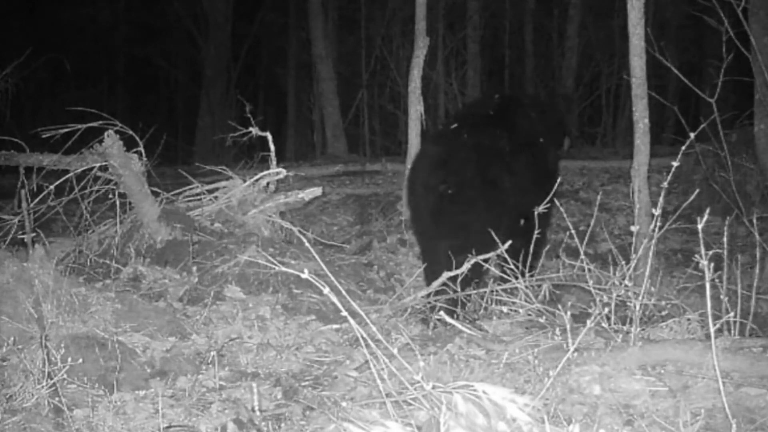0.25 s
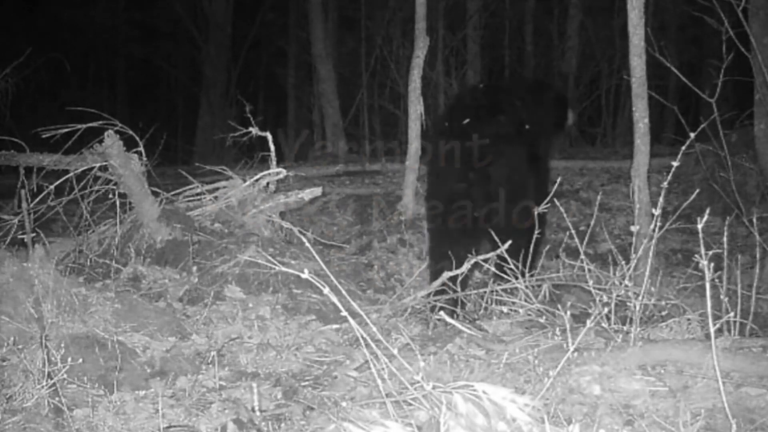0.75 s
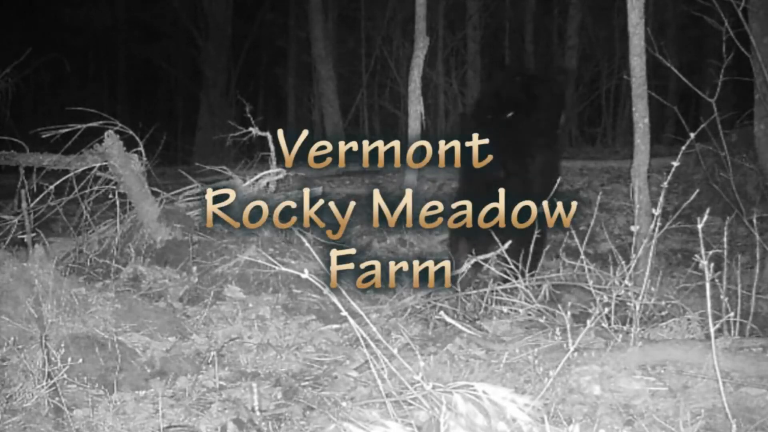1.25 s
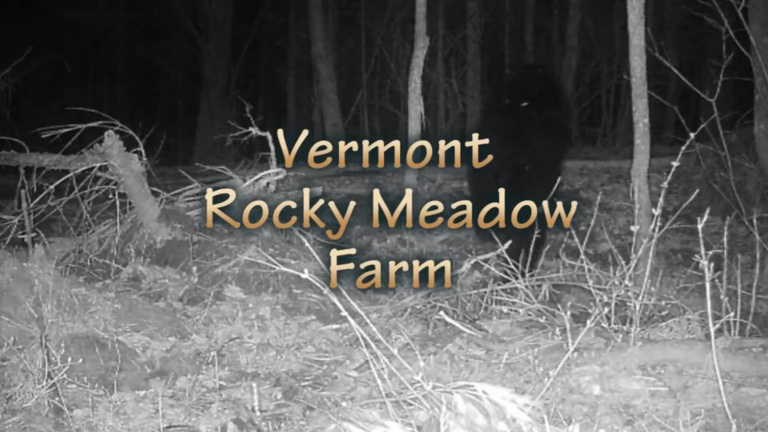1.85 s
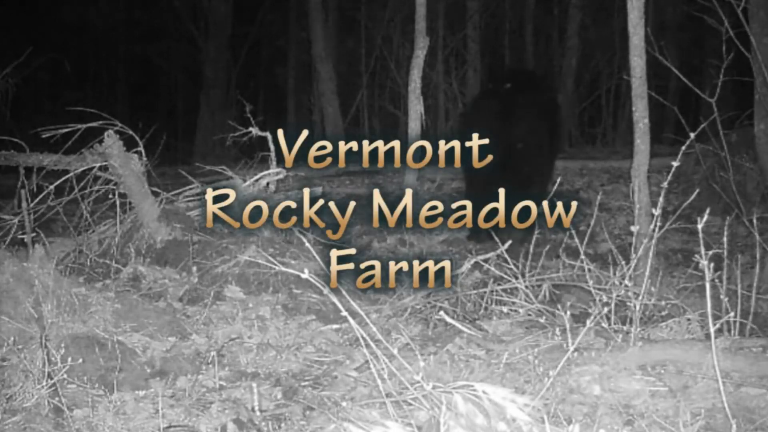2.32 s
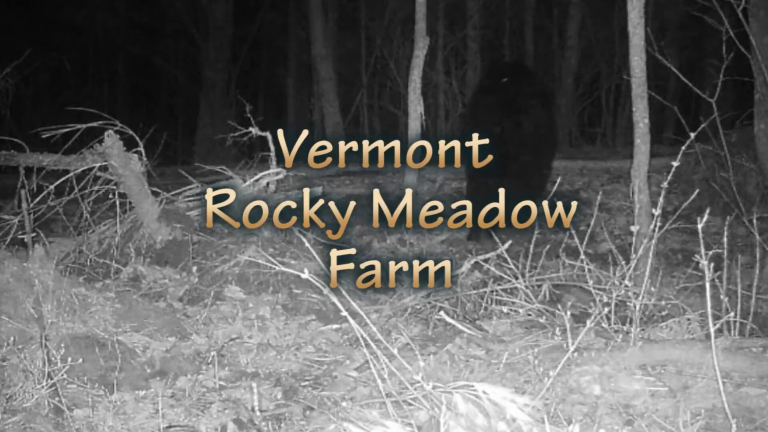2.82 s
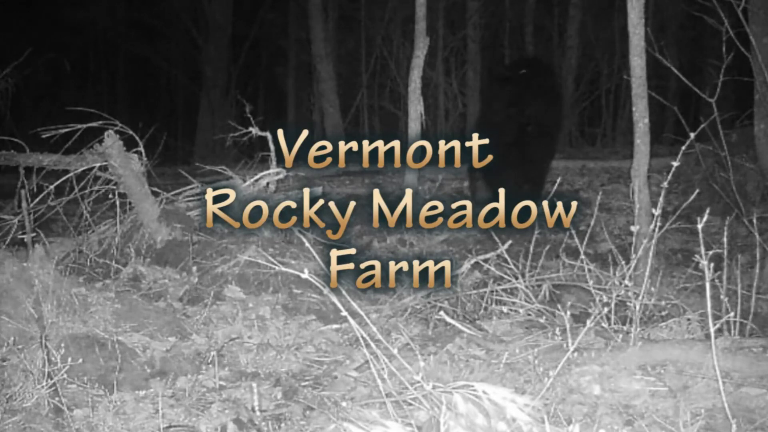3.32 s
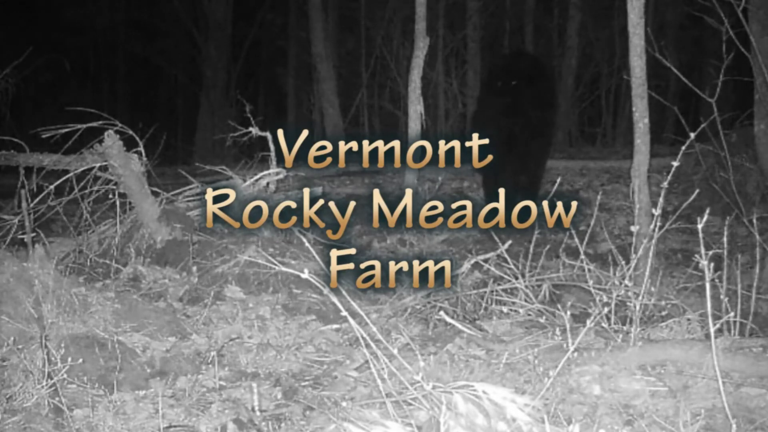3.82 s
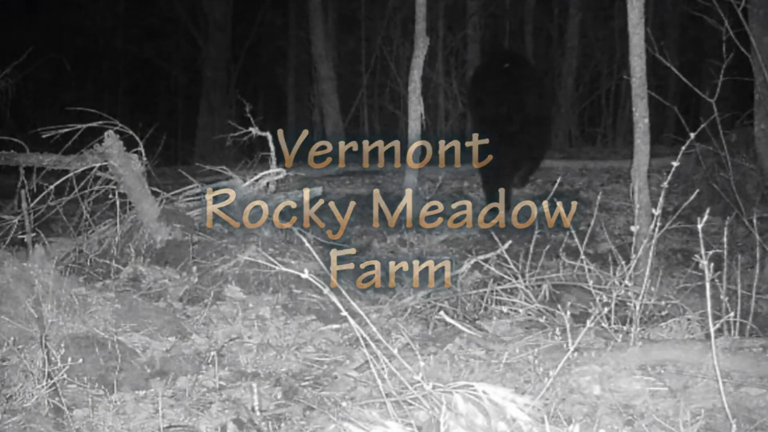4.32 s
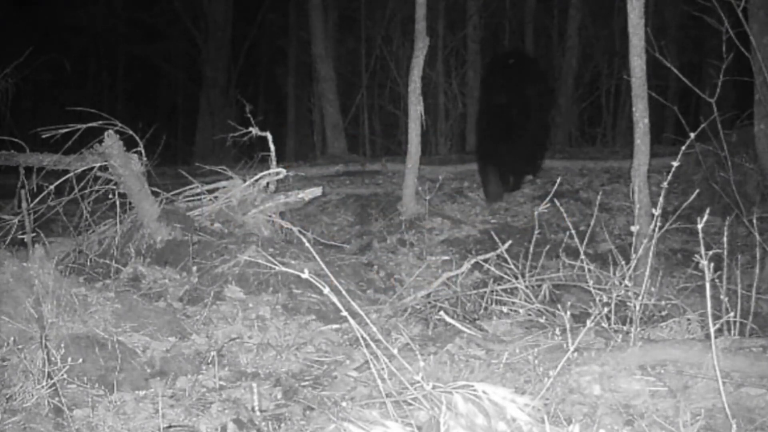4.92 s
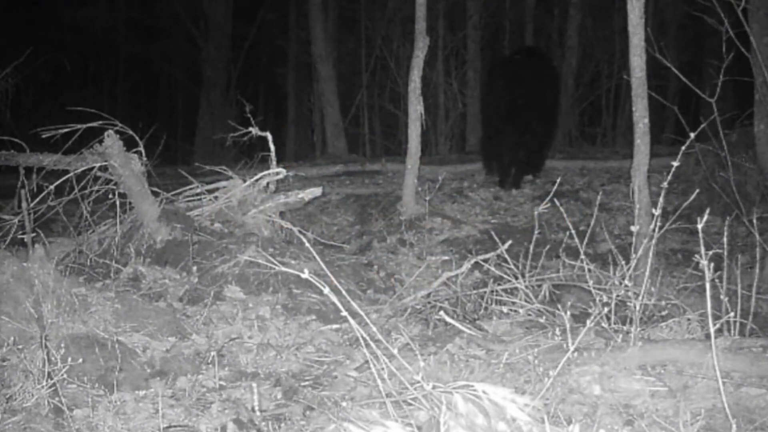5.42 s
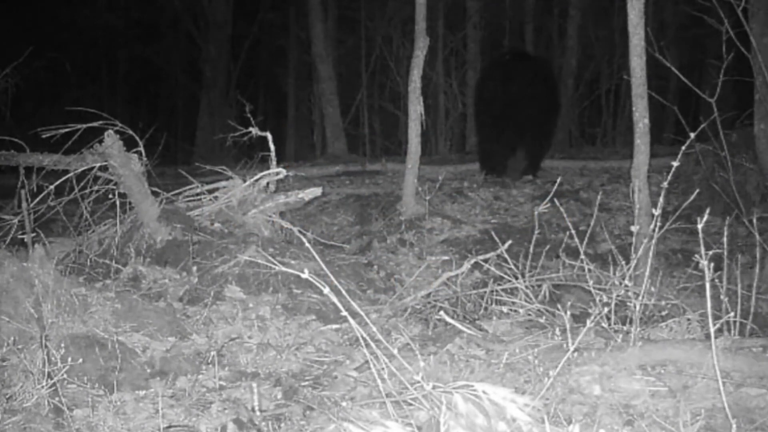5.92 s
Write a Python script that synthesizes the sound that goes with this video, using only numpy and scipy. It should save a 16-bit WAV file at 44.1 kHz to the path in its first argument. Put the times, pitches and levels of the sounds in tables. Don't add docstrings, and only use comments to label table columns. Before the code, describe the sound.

Distant owl duet in a dark forest: arched clear hoots, then rough rising notes ending in a downward slide, with crickets chirping steadily throughout.

```python
import sys
import numpy as np
from scipy import signal
from scipy.fft import rfft, irfft
from scipy.io import wavfile
from scipy.ndimage import uniform_filter1d

SR = 44100
rng = np.random.default_rng(int(sys.argv[2]) if len(sys.argv) > 2 else 0)


def store_wav(level_fs):
    pcm = np.round(np.clip(np.atleast_2d(level_fs), -1, 1) * 32767)
    wavfile.write(sys.argv[1], SR, pcm.T.astype(np.int16))


def to_linear_factor(level_db):
    exponent = np.asarray(level_db, float) / 20
    return 10 ** exponent


N = 271656


def evened(x):
    return x / np.sqrt(np.mean(x ** 2) + 1e-20)


def read(points, hz):
    f, value = np.transpose(points)
    return np.interp(np.log(hz + 1), np.log(f + 1), value)


def curve(points):
    return np.interp(np.arange(N) / SR, *np.transpose(points))


def add(mix, s, sound):
    at = round(s * SR)
    part, sound = mix[max(at, 0):], sound[max(-at, 0):]
    part[:len(sound)] += sound[:len(part)]


def band(x, lo_hz, hi_hz, order):
    return signal.sosfilt(signal.butter(order, [lo_hz, hi_hz], "bandpass", fs=SR, output="sos"), x)


def smooth_twice(x, size):
    return uniform_filter1d(uniform_filter1d(x, size), size)


def drift(per_s, size=N):
    slow = signal.butter(2, per_s, fs=SR, output="sos")
    return evened(signal.sosfilt(slow, rng.standard_normal(size)))


def woods(x, t60, start_s, channels):
    t = np.arange(SR) / SR
    taps = rng.choice([-1., 1.], (channels, SR)) * (rng.random((channels, SR)) < 2000 / SR)
    taps *= to_linear_factor(-60 * t / t60) * np.clip(t / start_s, 0, 1)
    return signal.fftconvolve(x[None], taps / np.linalg.norm(taps[0]), axes=1)[:, :N]


# (f/Hz, level/dB per Hz)
AIR = [(15, -56), (25, -27), (58, -19), (108, -19.5), (212, -35.5), (562, -29.5), (1160, -44.5),
       (1610, -32), (2380, 2), (2920, -21.5), (3320, -45.5), (4880, -35), (5700, -47), (7000, -44),
       (11700, -52), (15200, -100.5), (22000, -120)]


def air():
    frames, hz = N // 512 + 5, np.fft.rfftfreq(2048, 1 / SR)
    a, b = rng.standard_normal((2, 3, len(hz), frames))
    z = (a + 1j * b) * to_linear_factor(read(AIR, hz))[:, None]
    shared = 0.18 / (1 + hz / 900)[:, None]
    noise = signal.istft(z[:2] + shared * z[2], nperseg=2048)[1][:, :N]
    return to_linear_factor(-54) * evened(noise)


# (t/s, level/dB)
MURMUR = [(0, -88.5), (.5, -76.5), (.65, -74.5), (1.5, -74.5), (2.6, -69), (3.5, -72.5), (4.7, -73),
          (5.0, -85), (6.2, -96.5)]


def murmur():
    a, b, both = evened(band(rng.standard_normal((3, N)), 170, 460, order=2))
    swells = to_linear_factor(curve(MURMUR) + 3.9 * drift(7.1))
    return swells * (both + 0.15 * np.array([a, b]))


# (t/s, level/dB)
HUM = [(0, -76.5), (.48, -75.5), (.52, -100), (3.6, -100), (4.5, -78), (6.16, -77.5)]


def hum():
    t = np.arange(N) / SR
    return np.sqrt(2) * to_linear_factor(curve(HUM)) * np.sin(2 * np.pi * 107.7 * t)


def stroke(hz, fall_hz, length_s, partials_db, soft=1.3):
    u = np.linspace(0, 1, round(length_s * SR))
    turns = np.cumsum(hz + fall_hz * (.5 - u)) / SR
    shape = np.abs(np.sin(np.pi * u)) ** soft
    pulse = np.zeros(len(u))
    for k, db in enumerate(partials_db, 1):
        pulse += to_linear_factor(db) * shape ** (1 + 0.2 * (k - 1)) * np.sin(2 * np.pi * k * turns)
    return pulse


def trill(hz, fall_hz, per_s, db, overtone_db, blur_s=0.61):
    strokes_so_far = np.floor(np.cumsum(per_s * (1 + 0.16 * drift(8))) / SR)
    train = np.diff(strokes_so_far, prepend=0) * to_linear_factor(4.2 * drift(46))
    dry = signal.oaconvolve(train, stroke(hz, fall_hz, .8 / per_s, [0, overtone_db]))[:N]
    return to_linear_factor(db) * evened(woods(dry, blur_s, 0.0035, channels=2))


def phrases(rows, rest_db, edge_s):
    t, out = np.arange(N) / SR, np.full(N, float(rest_db))
    for s, length_s, db in rows:
        on = np.clip(np.minimum(t - s, s + length_s - t) / edge_s + .5, 0, 1)
        out = np.maximum(out, rest_db + (db - rest_db) * on)
    return out


# (start t/s, length t/s, level/dB)
LOW_SONG = [
    (-.2, 0.28, -43),
    (.44, 0.24, -53.5),
    (1.05, 0.42, -52.5),
    (1.86, 0.41, -54.5),
    (2.68, .36, -53),
    (3.42, 0.41, -53.5),
    (4.2, 0.43, -55),
    (5.0, 0.47, -55.5),
    (5.85, 0.32, -52.5),
]
MIDDLE_SONG = [(.12, 0.28, -50.5), (.54, .26, -49.5), (.95, 0.265, -50), (1.41, .22, -44.5),
               (1.89, 0.15, -40.5), (2.24, 0.2435, -48.5), (2.68, .26, -47), (3.16, .2, -51),
               (3.56, 0.278, -47), (4.05, .2, -46.5), (4.5, .24, -52), (4.96, 0.25, -48.5),
               (5.35, 0.271, -49), (5.84, 0.249, -51.5)]
HIGH_SONG = [
    (-.2, 0.24, -83.5),
    (.55, 0.33, -87.5),
    (1.75, 0.36, -89.5),
    (2.96, .34, -92),
    (3.87, .42, -91.5),
    (4.85, 0.43, -88.5),
    (5.76, .36, -89),
]


def chorus():
    low = phrases(LOW_SONG, rest_db=-68, edge_s=.12)
    middle = phrases(MIDDLE_SONG, rest_db=-77, edge_s=0.045)
    high = phrases(HIGH_SONG, rest_db=-106, edge_s=0.021)
    out = trill(2050, 240, 36, low + 0.37, -38.5)
    out += trill(2340, 220, 40, middle + 3.8, -27, blur_s=0.11)
    out += trill(4970, 200, 42, high + 12.0, -40, blur_s=.15)
    crowd = [(1850, -74.0), (2200, -61.0), (2520, -88.5), (2700, -64), (2880, -67.5)]  # (f/Hz, level/dB)
    for hz, db in crowd:
        out += trill(hz, 350, 43, db + 2.9 * drift(1.8), -32.5)
    return out


# (f/Hz, level/dB)
THROAT = [(150, -22), (250, -14), (400, 1), (560, 8.5), (700, -2.5), (900, -13.5), (1080, -22), (1250, -47)]


def hoot(rows, source_db, measured, rough, purer_db, edge_s):
    s, hz, db = np.transpose(rows)
    t = np.arange(s[0], s[-1], 1 / SR)
    hz, db = (uniform_filter1d(np.interp(t, s, c), 500, mode="nearest") for c in (hz, db))
    turns = np.cumsum(hz * (1 + .012 * drift(90, size=len(t)))) / SR
    thin_db = purer_db * np.log2(hz / 280)
    partial_db = [d - thin_db * (k > 1) + read(THROAT, k * hz) for k, d in enumerate(source_db, 1)]
    tone = np.zeros(len(t))
    for k, d in enumerate(partial_db, 1):
        tone += to_linear_factor(d - partial_db[measured]) * np.sin(2 * np.pi * k * turns)
    flutter = 1 + rough * drift(67, size=len(t))
    nearest_end_s = np.minimum(t - s[0], s[-1] - t)
    edges = np.sin(np.pi / 2 * np.clip(nearest_end_s / edge_s, 0, 1)) ** 2
    return s[0], np.sqrt(2) * to_linear_factor(db) * tone * flutter * edges


# (f/Hz, level/dB)
CLEAR_LOUD = [(180, -77), (230, -64.5), (300, -54), (400, -37), (470, -36.5), (535, -32.5), (570, -38.5),
              (592, -39.5)]


def clear_note(s, hold_s, top_hz, effort_db, climb_s):
    start_hz, glide_bend = 189.5, .9
    shoulder_in, shoulder_out = .91, .89
    drop_s, drop_to, sag_to = .017, .62, .43
    v = np.linspace(0, 1, num=9)
    u = v[1:]
    sag_s = .024 + 1.6 * max(hold_s - .074, 0)
    arch = shoulder_in + (shoulder_out - shoulder_in) * u
    rise = 1 - (shoulder_in + shoulder_out) / 2
    arch = arch + rise * np.sqrt(abs(np.sin(np.pi * u))) * min(hold_s / .08, 1)
    dropped = hold_s + drop_s + .13 * sag_s
    t = np.r_[climb_s * (v - 1), hold_s * u, dropped, dropped + sag_s * u]
    climb = start_hz * (shoulder_in * top_hz / start_hz) ** (v ** glide_bend)
    sag = drop_to + (sag_to - drop_to) * u ** .6
    hz = np.r_[climb, top_hz * np.r_[arch, drop_to, sag]]
    db = effort_db + 2 * (t == hold_s)
    db = db - 1 * (t > hold_s)
    db = db - 40 * np.maximum(t - dropped, 0)
    return np.c_[s + t, hz, db + read(CLEAR_LOUD, hz)]


CLEAR_DB = [2, -4, -19, -43.5]
# (plateau start t/s, plateau length t/s, top f/Hz, effort level/dB, climb length t/s)
CLEAR = [
    (-.03, 0.08, 523.4, -27.5, .08),
    (.303, .012, 390, -9.5, 0.084),
    (.658, 0.023, 573.6, -4, .093),
    (1.01, 0.041, 582.5, -1.5, 0.082),
    (1.357, .063, 573.1, 0, 0.083),
    (1.716, 0.078, 580.7, -0.5, 0.073),
    (2.067, .084, 583.7, 1, .068),
    (2.424, 0.084, 594, 0.5, 0.072),
    (2.64, .19, 588.2, 1, .068),
]


def clear_owl():
    out = np.zeros(N)
    for row in CLEAR:
        note = clear_note(*row)
        add(out, *hoot(note, CLEAR_DB, measured=0, rough=.08, purer_db=34, edge_s=.02))
    return out


STROKES = [0, .022, .05, .073, .096, .125, .149, .172]
WING_DB = [1, -25, -32, -48.5]
# (delay t/s, level/dB)
LEAVES = [(.0031, -11.5), (.0062, -9.5)]
# (t/s, level/dB, number of pulses)
CHIRPS = [(.184, -30, 5), (0.592, -29, 5), (1.001, -29.5, 8), (1.491, -30, 5), (1.885, -31, 5),
          (2.278, -30, 8), (2.749, -29.5, 5), (3.15, -31, 8), (3.628, -30, 5), (4.035, -30, 5),
          (4.463, -30, 8), (4.939, -30, 8), (5.399, -32, 5), (5.824, -29.5, 8)]


def cricket():
    dry = np.zeros(N)
    for s, db, count in CHIRPS:
        for k, after in enumerate(STROKES[:round(count)]):
            a, b = rng.standard_normal(2)
            force_db = -9 * np.exp(-k / 1.1) * (np.arange(4) > 0)
            pulse = stroke(2372 + 14 * a, 235, .02, WING_DB + force_db)
            add(dry, s + after - .0105, to_linear_factor(db + 5.0 + 1.8 * b) * pulse)
    direct = dry.copy()
    for s, db in LEAVES:
        add(dry, s, to_linear_factor(db + 3.7 * drift(30)) * direct)
    effort = uniform_filter1d(abs(dry), 1200)
    noise = rng.standard_normal((2, N))
    scrape = to_linear_factor(-46 + 6 * np.minimum(drift(18), 1.2)) * evened(band(noise, 3300, 4400, order=4))
    scrape += to_linear_factor(-52 + 5 * np.minimum(drift(12), 1.2)) * evened(band(noise, 6100, 6700, order=4))
    rectified = to_linear_factor(-24.5) * band(effort, 19, 35, order=1)
    wet = woods(dry, 0.27, 0.005, channels=3)
    shared = dry + to_linear_factor(-14) * wet[0]
    lag_s = 0.17 / 1000
    hz = np.fft.rfftfreq(2 * N, 1 / SR)
    late = irfft(rfft(shared, 2 * N) * np.exp(-2j * np.pi * hz * lag_s))[:N]
    pair = np.array([to_linear_factor(-1.2) * late, to_linear_factor(-.8) * shared])
    return pair + to_linear_factor(-14.5) * wet[1:] + effort * scrape + rectified * to_linear_factor(np.array([[-6], [0]]))


def tick():
    out = np.zeros(N)
    add(out, .4953, to_linear_factor(-40) * np.array([1, .6, .3]))
    return out


# (t/s, peak level/dB, f/Hz)
THUMPS = [
    (1.049, -70, 69),
    (2.863, -75, 100),
    (3.848, -88, 46.4),
]


def footfalls():
    out, t = np.zeros(N), np.arange(5000) / SR
    for s, db, hz in THUMPS:
        add(out, s - .03, to_linear_factor(db) * np.sin(2 * np.pi * hz * t) * np.hanning(5000))
    return out


# (f/Hz, level/dB)
REEDY_LOUD = [(160, -68.5), (200, -57.5), (228, -46), (255, -41.5), (290, -40.5), (325, -44.5),
              (360, -53.5), (435, -61)]


def reedy_note(s, climb_s, top_hz, effort_db, fall_s):
    rest_hz = 165
    u = np.linspace(0, 1, num=10)
    t = np.r_[climb_s * (u - 1), fall_s * u[1:]]
    hz = rest_hz + (top_hz - rest_hz) * np.r_[u ** .75, 1 - u[1:] ** 1.265]
    return np.c_[s + t, hz, effort_db + read(REEDY_LOUD, hz)]


REEDY_DB = [4.5, 3.5, 1.5, -12]
# (top t/s, climb length t/s, top f/Hz, effort level/dB, fall length t/s)
REEDY = [
    (1.648, 0.052, 222, -0.5, 0.065),
    (2.024, 0.08, 251.8, -3.5, .05),
    (2.39, 0.098, 283.2, -2.5, 0.074),
    (2.752, 0.085, 302.3, -0.5, 0.088),
    (3.112, 0.1, 331.6, -1, 0.051),
    (3.456, .106, 342.7, -1, .064),
    (3.79, .11, 363.6, -2, 0.071),
    (4.12, .11, 352.7, -0.5, 0.05),
]
# (t/s, f/Hz, effort level/dB)
SLIDE = [
    (4.22, 161, 0),
    (4.249, 251.6, 0),
    (4.266, 297.8, -2),
    (4.31, 312.2, 0.5),
    (4.36, 447.4, 0.5),
    (4.41, 419.8, 2),
    (4.45, 301, 0.5),
    (4.501, 246.7, -1.5),
    (4.769, 165, -2.5),
]


def reedy_owl():
    out = np.zeros(N)
    slide = [(s, hz, db + read(REEDY_LOUD, hz)) for s, hz, db in SLIDE]
    for rows in [reedy_note(*row) for row in REEDY] + [slide]:
        add(out, *hoot(rows, REEDY_DB, measured=1, rough=.25, purer_db=3.0, edge_s=.035))
    return out


# (delay t/s, level/dB)
ECHOES = [(.03, -8.5), (.055, -15.5), (.105, -19), (.16, -20.5)]
# (t/s, level/dB)
WET = [(0, -3.5), (1.6, -2.5), (2.3, -2), (4.7, 1.5), (4.85, 1.5), (4.95, -14.5), (5.1, -32), (6.2, -42)]


def owls():
    voices = clear_owl() + reedy_owl()
    breath = smooth_twice(abs(voices), 2000) * evened(band(rng.standard_normal(N), 300, 850, order=4))
    dry = band(voices, 200, 1200, order=2) + to_linear_factor(-32.5) * breath
    dull = band(band(dry, 400, 1100, order=1), 200, 1100, order=3)
    echoes = np.zeros(N)
    for s, db in ECHOES:
        add(echoes, s, to_linear_factor(db) * dull)
    scatter, spread = woods(dull, 1.0, 0.015, channels=2)
    wash = woods(dull, 5.4, 0.21, channels=1)[0]
    heard_db = 10 * np.log10(abs(smooth_twice(dry ** 2, round(.095 * SR))) + 1e-9)
    wet = to_linear_factor(curve(WET) + .41 * np.clip(heard_db + 46.5, -20, 0))
    ahead = dry + wet * (echoes + to_linear_factor(-7.0) * scatter + to_linear_factor(-11.0) * wash)
    return ahead * to_linear_factor(np.array([[-.3], [.3]])) + wet * to_linear_factor(-19.0) * spread * [[1], [-1]]


def mask(x, depth_db, above_hz):
    hz, _, z = signal.stft(x, SR, nperseg=1024)
    power = uniform_filter1d((abs(z) ** 2).mean(0), 9, axis=0)
    band_db = 10 * np.log10(abs(power) + 1e-20)
    loudest_db = uniform_filter1d(band_db[hz > 1500].max(0), size=15, origin=4)
    lenient_db = 2.7 * np.maximum(hz / 1000 - 6.5, 0)[:, None]
    under = np.clip((loudest_db - depth_db - lenient_db - band_db) / 3, 0, 1)
    under = under * (hz > above_hz)[:, None]
    return signal.istft(z * to_linear_factor(-18 * under), SR, nperseg=1024)[1][:, :N]


def scene():
    lean = to_linear_factor(np.array([[-1.2], [1.2]]))
    background = lean * (air() + murmur() + hum() + footfalls())
    return background + chorus() + cricket() + owls()


def band_limit(x):
    return signal.sosfilt(signal.butter(12, 11860, fs=SR, output="sos"), x)


def record(dry):
    mix = mask(dry, depth_db=55, above_hz=3150) + tick()
    return band_limit(mix)


dry = scene()
out = record(dry)
store_wav(out)
```